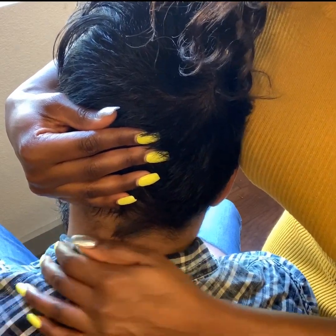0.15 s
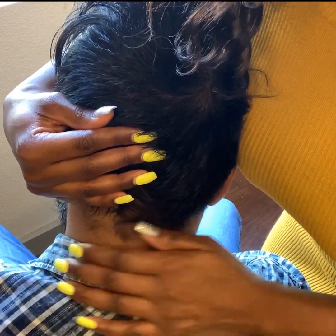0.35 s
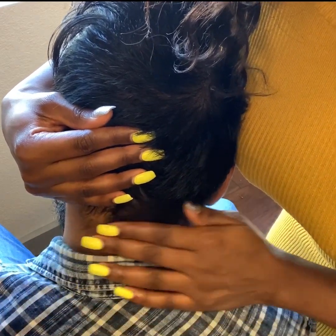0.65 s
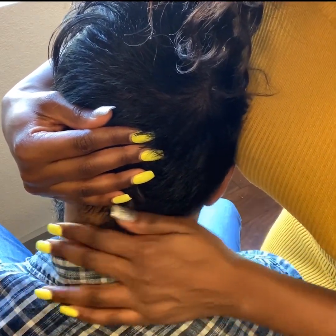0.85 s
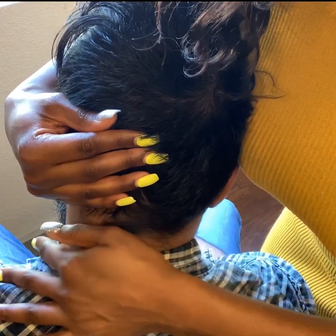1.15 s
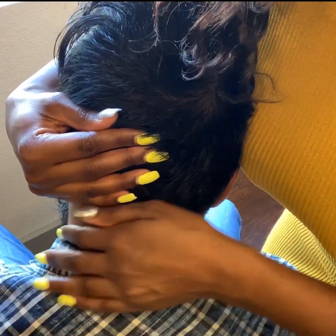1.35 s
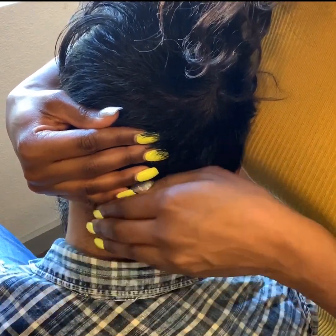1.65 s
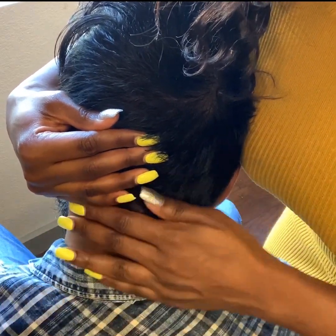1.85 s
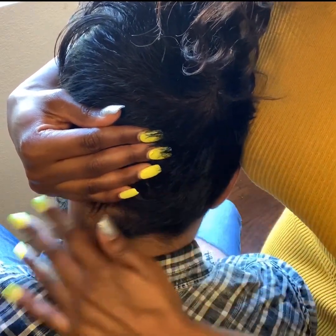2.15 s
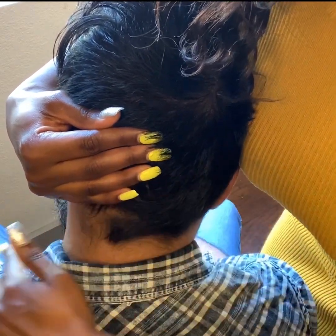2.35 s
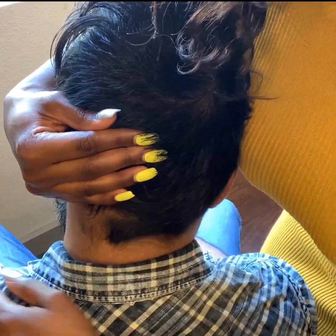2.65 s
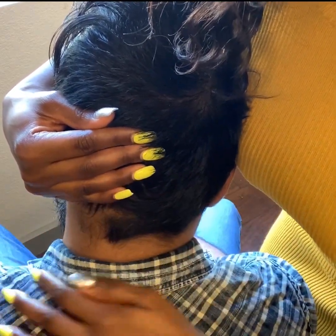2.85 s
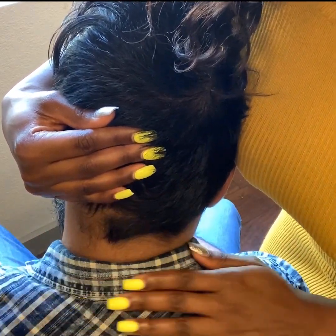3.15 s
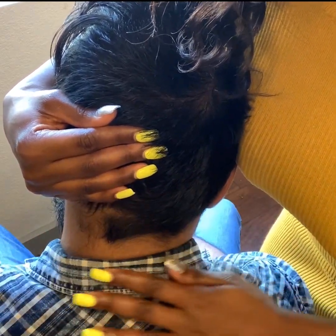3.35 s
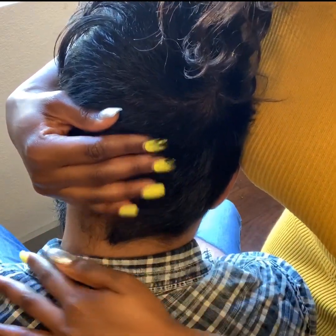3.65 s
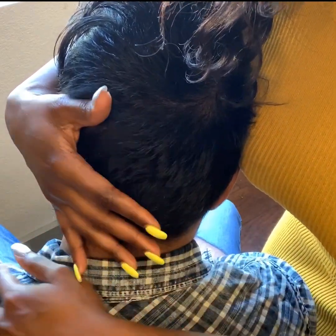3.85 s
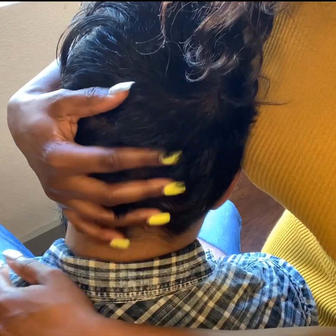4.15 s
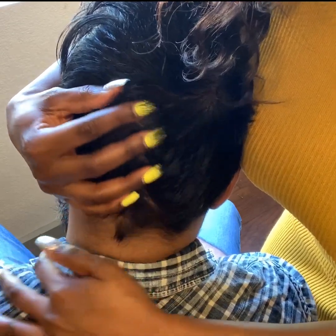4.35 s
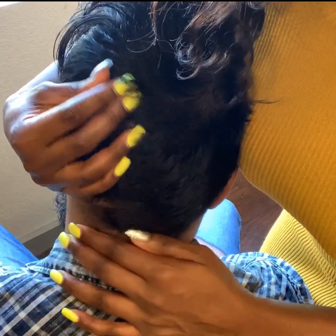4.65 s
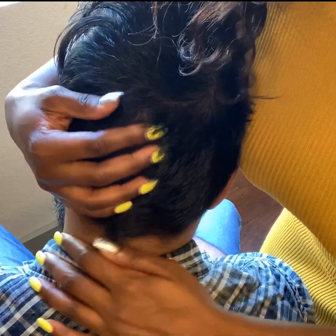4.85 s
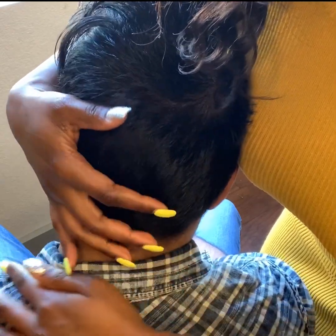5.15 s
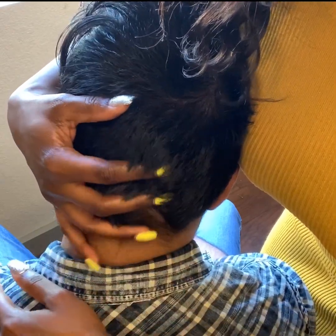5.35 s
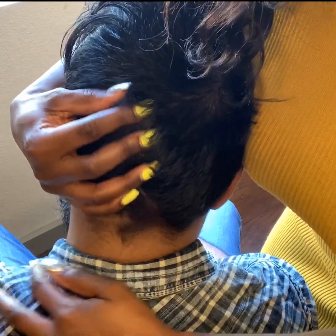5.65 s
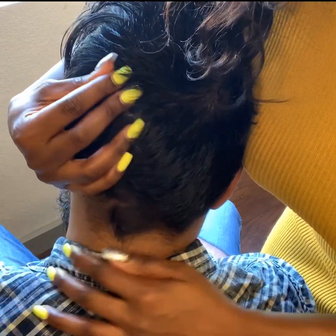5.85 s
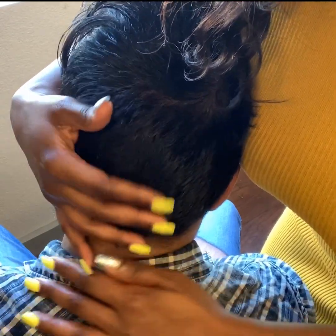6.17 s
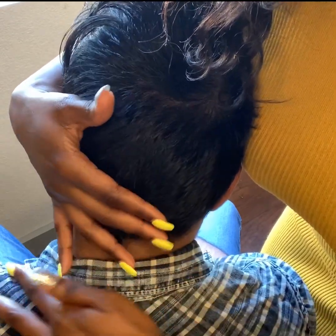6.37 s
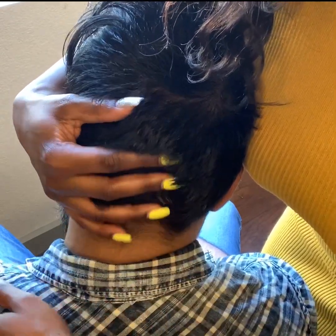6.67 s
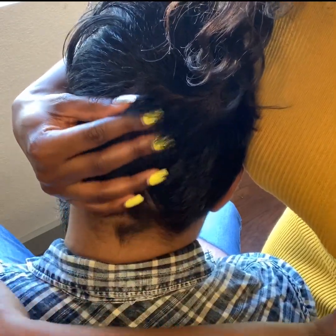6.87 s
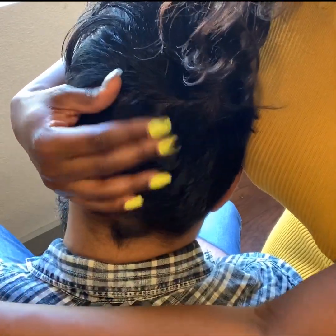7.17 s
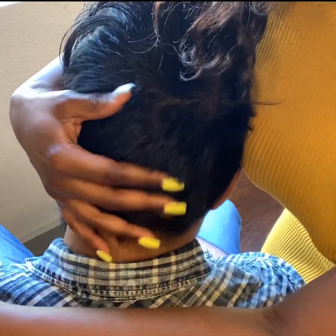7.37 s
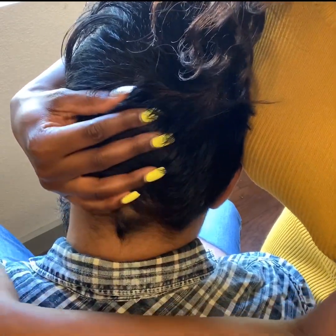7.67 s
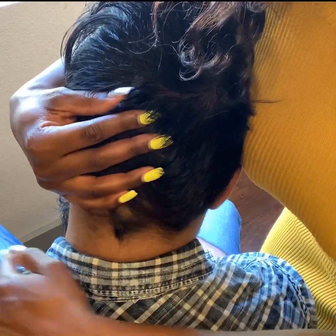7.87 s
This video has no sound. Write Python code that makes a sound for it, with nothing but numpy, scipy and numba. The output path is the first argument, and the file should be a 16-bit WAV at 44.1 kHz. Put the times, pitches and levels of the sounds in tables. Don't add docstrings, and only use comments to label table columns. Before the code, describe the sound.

Soft dry strokes of a palm, then long nails, swish through short hair over a low steady room rumble, with two tiny ticks midway.

```python
import sys
import numpy as np
from scipy import signal
from scipy.fft import rfft, irfft, next_fast_len
from scipy.io import wavfile
from scipy.ndimage import uniform_filter1d
from numba import njit

SR = 44100
rng = np.random.default_rng(int(sys.argv[2]) if len(sys.argv) > 2 else 0)


def convert_level_to_amplitude(level_db):
    exponent = np.asarray(level_db, float) / 20
    return 10 ** exponent


def file_out(sig):
    cols = np.atleast_2d(sig).T
    lim = np.clip(cols, -1, 1)
    pcm = np.round(lim * 32767).astype(np.int16)
    wavfile.write(sys.argv[1], SR, pcm)


N = 353241
T = np.arange(N) / SR
SIZE = next_fast_len(N + SR // 10, real=True)
HZ = np.arange(SIZE // 2 + 1) * SR / SIZE + 1e-3
LOG_HZ = np.log(HZ)

# start_s, rumble_db, duct_whirl_db (re its mean)
DRAUGHT = [(0.0, -42.5, 0), (0.06, -53, -1), (1.23, -46, 0.5), (2.03, -51.5, 0.5), (2.72, -46, -1.5),
           (2.99, -56, 0.5), (3.59, -48, 0.5), (4.17, -54, -1.5), (4.42, -45, -3), (4.64, -50.5, 0.5),
           (5.73, -48.5, -2), (6.16, -53.5, 2.5), (6.36, -44.5, -3), (6.56, -53, -0.5), (7.76, -51.5, 1),
           (7.79, -61, 2), (7.94, -46, -1), (8.01, -49, -3)]
# centre_hz, width_hz, level_db
BASS_MODES = [(45, 4, 3), (59.55, 6.2, 3.5), (73.9, 9.3, 0), (88.2, 7.8, -1)]
# centre_hz, width_hz, level_db
UPPER_MODES = [(117, 5.3, 1), (134.2, 8.9, 0), (152.7, 24, -8.5), (176.4, 33, -14.5), (234.6, 52.6, -15)]
# centre_hz, width_hz, level_db
DUCT_MODES = [(259, 22, 0), (314.5, 28, 0), (357.6, 30, -3)]
# pitch_hz, level_db
MAINS = [(239.5, -66), (120.6, -68.5)]
# freq_hz, level_db
HISS_TONE = [(300, 1), (500, 4.5), (1000, 2), (3000, -2), (8000, -10.5), (12000, -10.5), (15300, -17),
             (15900, -45)]

# start_s, hold_s, hair_db, tips_db (re hair), skin_db (re hair)
HAND_STROKES = [(0.0, 0.0089, -69, -11, 0), (.13, .05, -75, -10, 1.2), (0.18, .05, -75, -10, 3.5),
                (0.256, 0.12, -67.5, -12, -0.5), (0.409, 0.13, -66, -6, -3), (.52, 0.1, -69.5, -4, -1),
                (0.808, 0.089, -68.5, -2.5, -1.5), (0.923, 0.13, -71, -7, 0), (1.07, .07, -70, -7, 0),
                (1.147, 0.071, -67, -6, -1.2), (1.38, 0.037, -65.5, -2.5, -7), (1.43, 0.052, -68, -7, -3),
                (1.63, 0.077, -75.5, -3, 1.5), (2.04, 0.17, -69.5, -8, 1.5), (2.19, .03, -68, -10, 2),
                (2.238, 0.067, -63, -10, 5), (2.323, 0.21, -66, -9.5, 0.8), (2.725, 0.23, -64, -7, -4),
                (2.96, 0.16, -64.5, -5.5, -2.5), (3.1, .12, -65, -5.5, -2.5), (3.408, 0.092, -65, -5, -5),
                (3.5, 0.17, -62, -9, -5), (3.696, 0.066, -65.5, -10, 1), (3.785, 0.26, -67, -8, -3),
                (4.234, 0.13, -67, -4.5, -5), (4.378, 0.3, -65, -6.5, -1.5), (4.73, 0.29, -77.5, -5, .6),
         (4.887, 0.15, -70, -6.5, -0.7), (5.048, 0.11, -65.5, -8.5, -2.5), (5.17, 0.13, -66.5, -9, -2.5),
         (5.307, .06, -65, -5, -3.5), (5.393, 0.025, -69, -1.2, -3.5), (5.515, 0.16, -75, 2, -4),
         (5.657, 0.054, -68.5, -3, -7.5), (5.73, .04, -64.5, -7, -7.5), (5.78, 0.17, -66, -6, -3.5),
         (5.948, 0.074, -65.5, -7, -6), (6.215, .05, -69, -7.5, -2.5), (6.27, 0.17, -64.5, -10, -4),
         (6.435, 0.17, -66, -8, -4.5), (6.654, 0.078, -65, -7, -6.5), (6.745, .25, -68, -8, -4.5),
         (6.978, 0.16, -68, -8.5, -0.5), (7.16, .05, -74, -12, 3.5), (7.34, .12, -77.5, -7, -6),
         (7.486, 0.1, -71, -1.5, -11), (7.774, .05, -66.5, -8, -0.5), (7.83, 0.095, -64.5, -9, 0),
         (7.93, .1, -64.5, -5, 0)]
# hair_db, tips_db, skin_db
REST_DB = (-80.5, -87, -78.5)
# start_s, pitch_hz
HOLLOW = [(0.0, 2750), (0.06, 2420), (0.87, 2640), (1.23, 1920), (1.31, 2240), (3.41, 2600), (3.68, 2200),
          (3.79, 2850), (4.08, 2320), (4.19, 3130), (4.68, 2400), (6.51, 2670), (6.58, 2310), (6.72, 3020),
          (7.03, 2380), (8.01, 2300)]
# freq_hz, level_db
HAIR_TONE = [(3000, -22.5), (3900, -4), (5000, 0.5), (6500, -1.5), (7800, -0.5), (8200, 2), (9500, 0.5),
             (11000, -24.5)]
# freq_hz, level_db
TIPS_TONE = [(9000, -51), (10000, -1), (11500, -4), (13000, -2.5), (14800, -4), (15500, 1), (15900, -46)]
# freq_hz, level_db
SCALP_TONE = [(1100, -6), (1500, 1), (2000, 1), (2600, -2.5), (3200, 0.5), (4000, -2), (5000, -18)]

# start_s, hold_s, collar_db, sleeve_db
RUB = [(0.0, .005, -72, -68), (.38, 0.054, -72, -76), (.88, 0.11, -75, -70), (1.17, .03, -73, -78),
       (2.19, .04, -68.5, -79), (2.253, .035, -62.5, -66), (2.33, 0.12, -69, -67.5), (2.767, .02, -76, -72),
       (2.94, 0.022, -73, -68), (3.045, .09, -68.5, -70), (3.585, 0.027, -73, -69.5),
       (3.95, .04, -72, -71.5), (4.453, .15, -73, -77.5), (4.634, 0.36, -73.5, -75.5),
       (5.07, .02, -78, -70), (5.75, .04, -77, -72.5), (5.95, .08, -74, -74), (6.076, .05, -82, -73.5),
       (6.3, 0.18, -75, -74), (6.75, .12, -77.5, -75), (7.16, .03, -84, -68), (7.82, .08, -74, -79),
       (7.93, .07, -67, -68)]
# freq_hz, level_db
CLOTH_TONE = [(650, -21.5), (800, -3.5), (980, 1), (1150, -1.5), (1350, -1.5), (1700, -39)]
# freq_hz, level_db
SLEEVE_TONE = [(300, -26), (380, -0.5), (550, -2), (750, -5.5), (900, -22)]
# start_s, hold_s, level_db, pitch_hz
ZIPS = [(1.12, .04, -75, 1900), (1.17, .02, -64.5, 1900), (1.2, 0.044, -72, 1800), (1.66, .012, -69, 1350),
        (2.183, 0.049, -64, 1040), (2.247, .03, -64.5, 1000), (2.862, 0.014, -64.5, 1030),
        (2.895, .006, -68.5, 1060), (2.963, .008, -63, 1400), (3.652, .008, -58, 1010),
        (4.598, 0.16, -74.5, 1050), (4.802, 0.12, -71, 1025), (4.92, .07, -73, 1040),
        (7.86, .01, -71, 1750), (7.928, .015, -63, 2200), (7.95, .03, -66, 1000)]

# start_s, peak_db
DULL_TICKS = [
    (3.6532, -31.5),
    (3.655, -46),
    (3.9659, -47),
]
# start_s, peak_db
BRIGHT_TICKS = [
    (4.2118, -30),
    (4.2129, -45),
]
# pitch_hz, level_db, t60_s
DULL_MODES = [(1000, 0, 0.023), (1570, 3.5, 0.014), (2060, 10, 0.011), (2200, 0, 0.011), (2530, 5, 0.015),
              (2600, -13.5, 0.15), (2900, -6, 0.0068), (13000, -3, 0.0066)]
# pitch_hz, level_db, t60_s
BRIGHT_MODES = [(2850, -20, 0.019), (3140, -6.5, 0.036), (4600, -13, .01), (5940, -13, 0.0099),
                (7400, -5.5, 0.016), (8350, -6, 0.0051), (12060, 0, 0.005), (13400, 3, 0.006),
                (14800, 0.5, 0.0084), (15500, -12, .008)]

# freq_hz, power_share
DIRECT = [(500, 0.037), (3000, 0.034), (4700, 0.23), (5600, 0.075), (7000, 0.36), (8300, 0.83), (10000, 1),
          (15000, 1)]
# freq_hz, phase_rad
TURN = [(5500, 0), (6200, 2.1), (7600, 0.0093)]


def level(x, db):
    return x * convert_level_to_amplitude(db) / np.sqrt(np.mean(x ** 2))


def along(table):
    hz, value = np.transpose(table)
    return np.interp(LOG_HZ, np.log(hz), value)


def curves(table):
    s, *columns = np.transpose(table)
    return [np.interp(T, s, column) for column in columns]


def colour(x, table):
    gain = convert_level_to_amplitude(along(table))
    return rfft(x, SIZE) * gain / np.sqrt(np.mean(gain ** 2))


def walk(rate):
    k = int(SR / rate)
    held = np.repeat(rng.standard_normal(N // k + 1), k)
    return 1.21 * uniform_filter1d(uniform_filter1d(held, k), k)[:N]


@njit
def svf(x, g, q):
    y = np.empty_like(x)
    for c in range(x.shape[0]):
        band, low = 0., 0.
        for i in range(x.shape[1]):
            v = (band + g[i] * (x[c, i] - low)) / (1 + g[i] * (g[i] + 1 / q))
            band, low, y[c, i] = 2 * v - band, low + 2 * g[i] * v, v / q
    return y


def lean(db):
    return convert_level_to_amplitude(np.array([0 * db, db, -db]) / 2).reshape(3, -1)


def pressure(rows, rest_db, rise, fall, round_s):
    out = np.full(N, 1. * rest_db)
    for start, hold, db in rows:
        before = np.maximum(start - T, 0)
        after = np.maximum(T - start - hold, 0)
        out = np.maximum(out, db - rise * before - fall * after)
    return uniform_filter1d(out, int(round_s * SR))


def flicks(rate, spread_db, uneven_db, shared, wander):
    when, size = rng.random((2, 3, N), dtype=np.float32)
    go = when < rate / SR
    sign = np.sign(size[go] - .5)
    x = np.zeros((3, N))
    x[go] = sign * (2 * size[go] % 1 + 1e-6) ** -(spread_db * np.log(10) / 20)
    shift = np.round(wander * walk(2.5)).astype(int)
    late = np.clip(np.arange(N) + shift, 0, N - 1)
    x[2] = np.sqrt(1 - shared) * x[2] + np.sqrt(shared) * x[1, late]
    return level(x * convert_level_to_amplitude(uneven_db * walk(25)), 0)


def rumble(modes, side_db):
    power = sum(convert_level_to_amplitude(2 * db) / (1 + ((HZ - hz) / width * 2) ** 2) ** 1.64 for hz, width, db in modes)
    gain = np.sqrt(power) * HZ ** 2 / (HZ ** 2 + 32 ** 2)
    real, imag = rng.standard_normal((2, 2, len(HZ)))
    mid, side = irfft((real + 1j * imag) * gain, SIZE)[:, :N]
    mid = mid / uniform_filter1d(np.abs(mid), SR // 6) ** 0.84
    return level(mid, 0) + level(side, side_db) * np.array([[1], [-1]])


def room():
    flow_db, whirl_db = curves(DRAUGHT)
    flow_db = flow_db + 1.46 * walk(6)
    swing = flow_db - flow_db.mean()
    upper_db = -57.5 + 0.56 * swing + .6 * whirl_db + 0.6 * walk(6)
    duct_db = -74 + 0.11 * swing + whirl_db + 1.6 * walk(7)
    air = convert_level_to_amplitude(flow_db + 0.43) * rumble(BASS_MODES, side_db=-13.5)
    air = air + convert_level_to_amplitude(upper_db) * rumble(UPPER_MODES, side_db=-8.0)
    air = air + convert_level_to_amplitude(duct_db) * rumble(DUCT_MODES, side_db=-4.5)
    hum = 0
    for hz, db in MAINS:
        phase = 2 * np.pi * hz * T + 0.34 * walk(2.12)
        hum = hum + np.sqrt(2) * convert_level_to_amplitude(db + 1.46 * walk(3)) * np.sin(phase)
    left, right = (air + hum) * convert_level_to_amplitude([[-.75], [.75]])
    return np.array([np.roll(left, 12), right])


def hiss():
    return colour(rng.standard_normal((3, N)) * convert_level_to_amplitude(-73), HISS_TONE)


def hands():
    start, hold, hair, tips, skin = np.transpose(HAND_STROKES)
    waver_db = 0.67 * walk(12)
    layers = zip((hair, hair + tips, hair + skin), REST_DB)
    return [pressure(zip(start, hold, db), rest, rise=228, fall=190, round_s=0.029) + waver_db
            for db, rest in layers]


def strokes(hair_db, tips_db, scalp_db):
    hollow_hz = curves(HOLLOW)[0] * (1 + 0.13 * walk(9))
    pan_db = 3.5 + 0.25 * (hair_db - hair_db.min())
    hairs = flicks(12000, spread_db=1.8, uneven_db=.9, shared=.33, wander=20)
    skin = flicks(6000, spread_db=1.8, uneven_db=1.1, shared=.5, wander=20)
    drag = .7 * hairs + .7 * skin
    drag = drag + convert_level_to_amplitude(2) * svf(drag, np.tan(np.pi * hollow_hz / SR), 2.93)
    strands = colour(hairs * convert_level_to_amplitude(hair_db + 2.0) * lean(2.7), HAIR_TONE)
    tips = colour(hairs * convert_level_to_amplitude(tips_db + 7.0), TIPS_TONE)
    scalp = colour(drag * convert_level_to_amplitude(scalp_db - 1.5) * lean(pan_db), SCALP_TONE)
    return strands + tips + scalp


def rub(hair_db):
    start, hold, collar, sleeve = np.transpose(RUB)
    collar_db = pressure(zip(start, hold, collar), -81.5, rise=265, fall=265, round_s=0.022)
    collar_db = np.maximum(collar_db, hair_db - 11.5)
    sleeve_db = pressure(zip(start, hold, sleeve), -76, rise=265, fall=265, round_s=.02)
    threads = flicks(4000, spread_db=1.5, uneven_db=2.0, shared=0.28, wander=10.0)
    shuffle = rng.standard_normal((3, N)) * convert_level_to_amplitude(2.9 * walk(20))
    cloth = colour(threads * convert_level_to_amplitude(collar_db + 1.5) * lean(0.67), CLOTH_TONE)
    return cloth + colour(shuffle * convert_level_to_amplitude(sleeve_db + 1.5) * lean(1.6), SLEEVE_TONE)


def zips():
    start, hold, db, hz = np.transpose(ZIPS)
    halfway = (start[1:] + (start + hold)[:-1]) / 2
    pitch_hz = uniform_filter1d(hz[np.searchsorted(halfway, T)], SR // 200)
    g = np.tan(np.pi * pitch_hz / SR)
    threads = flicks(3000, spread_db=1.5, uneven_db=2.2, shared=0.77, wander=4)
    ring = svf(svf(threads, g, 4.6), g, 4.6)
    gain = convert_level_to_amplitude(pressure(zip(start, hold, db), -100, rise=700, fall=700, round_s=.006))
    return rfft(level(ring, 0) * gain * lean(1.7), SIZE)


def ticks(events, modes, contact_s):
    t = np.arange(SR // 8) / SR
    ring = sum(convert_level_to_amplitude(db - 60 * t / t60) * np.sin(2 * np.pi * hz * t) for hz, db, t60 in modes)
    ring *= (1 - np.exp(-t / contact_s)) ** 2
    out = np.zeros(N)
    for s, db in events:
        out[int(s * SR):][:len(t)] += convert_level_to_amplitude(db) * ring / np.abs(ring).max()
    return out


def bounce(x):
    t = np.arange(SR // 20) / SR
    tails = rng.standard_normal((2, len(t))) * convert_level_to_amplitude(-60 * t / 0.012)
    tails /= np.sqrt(np.sum(tails ** 2, axis=1, keepdims=True))
    return rfft(x, SIZE) * np.vstack([np.ones(len(HZ)), rfft(tails, SIZE)])


def ports(straight, *bounced):
    lag_s = 0.0001908
    share = np.clip(along(DIRECT), 0, 1)
    left = -np.exp(-2j * np.pi * HZ * lag_s - 1j * along(TURN))
    direct = np.array([left, np.ones(len(HZ))]) * straight
    mix = np.sqrt(share) * direct + np.sqrt(1 - share) * np.array(bounced)
    return irfft(mix, SIZE)[:, :N]


def scene():
    touch = hands()
    dull = ticks(DULL_TICKS, DULL_MODES, contact_s=.00025)
    bright = ticks(BRIGHT_TICKS, BRIGHT_MODES, contact_s=.00022)
    knocks = convert_level_to_amplitude(-4.5) * bounce(dull) + convert_level_to_amplitude(2.0) * bounce(bright)
    near = ports(*(hiss() + strokes(*touch) + rub(touch[0]) + zips() + knocks))
    return near + convert_level_to_amplitude(-1.0) * dull + convert_level_to_amplitude(-15.0) * bright + room()


def band_limit(x):
    return signal.sosfilt(signal.butter(12, 16290, fs=SR, output="sos"), x)


def record(dry):
    return band_limit(dry)


dry = scene()
out = record(dry)
file_out(out)
```